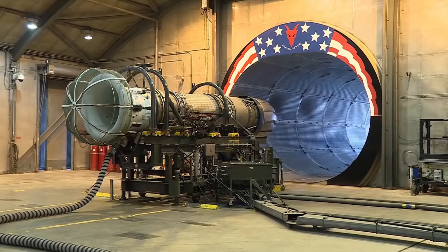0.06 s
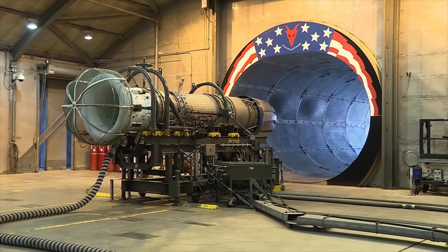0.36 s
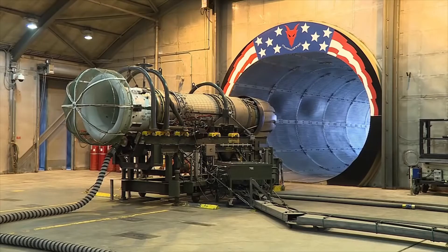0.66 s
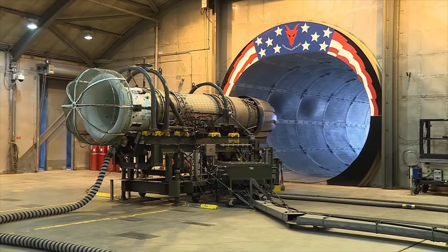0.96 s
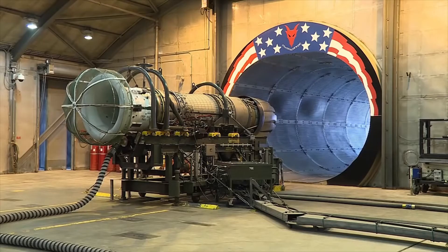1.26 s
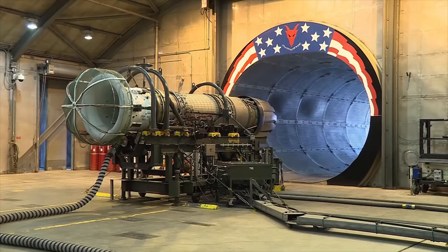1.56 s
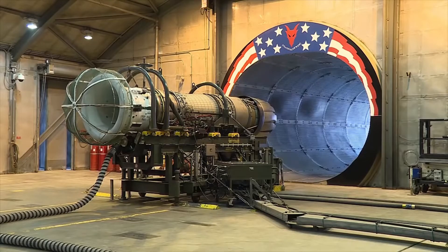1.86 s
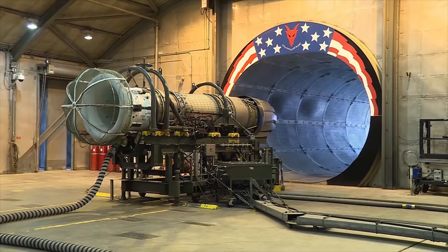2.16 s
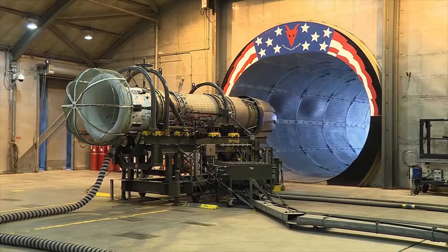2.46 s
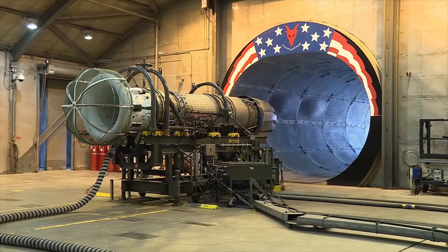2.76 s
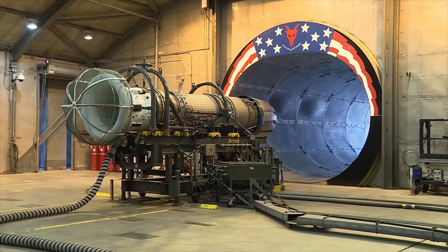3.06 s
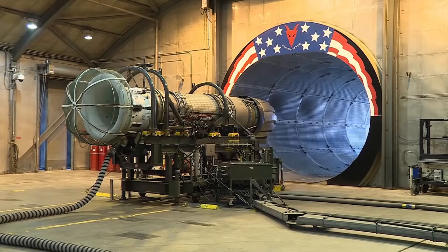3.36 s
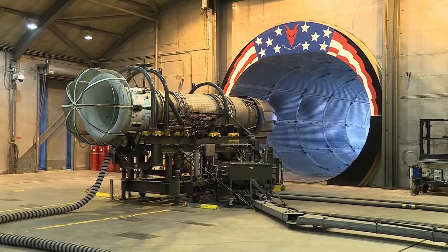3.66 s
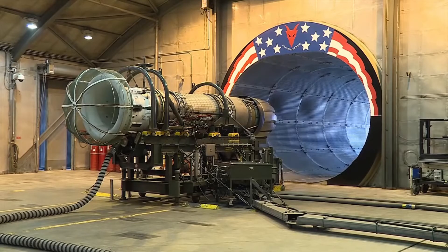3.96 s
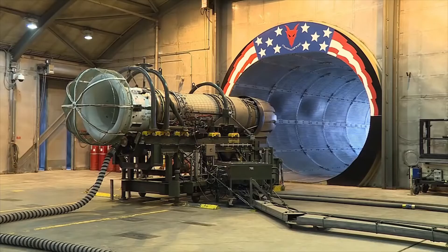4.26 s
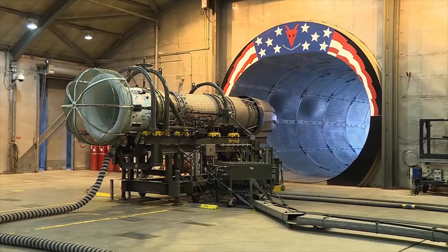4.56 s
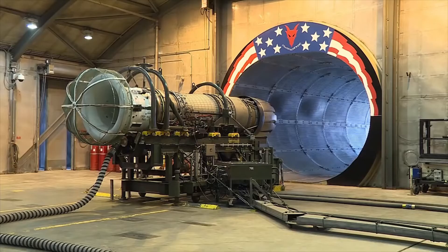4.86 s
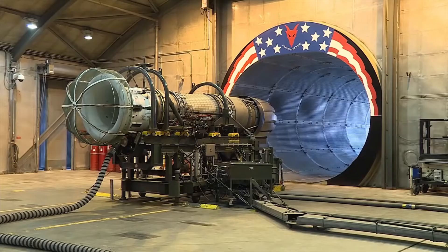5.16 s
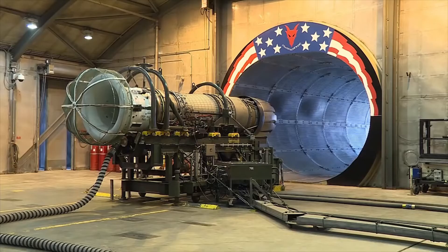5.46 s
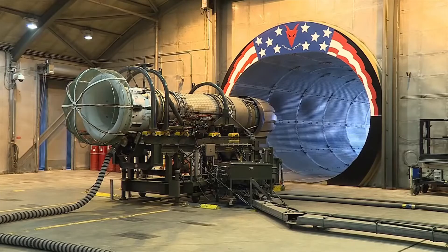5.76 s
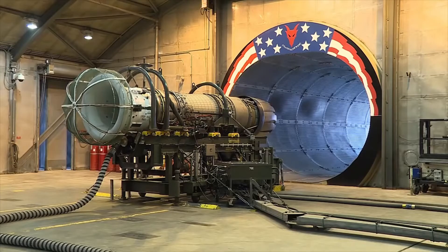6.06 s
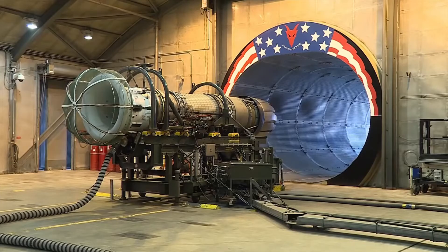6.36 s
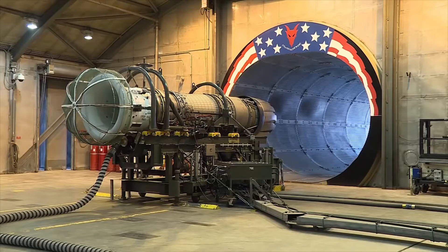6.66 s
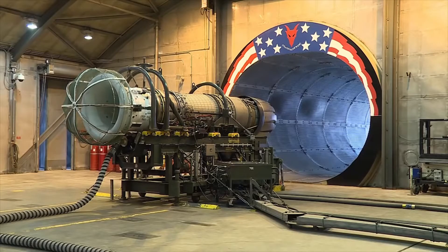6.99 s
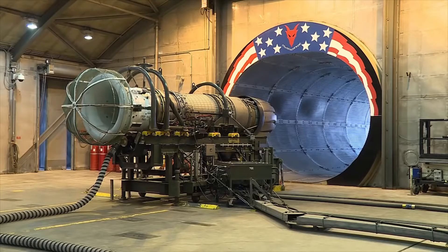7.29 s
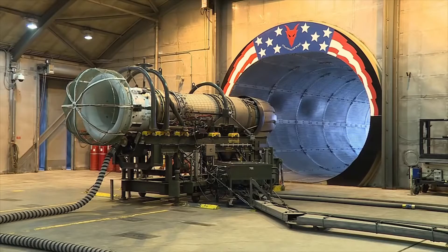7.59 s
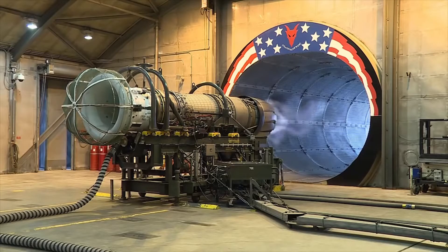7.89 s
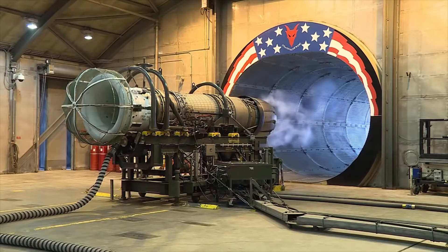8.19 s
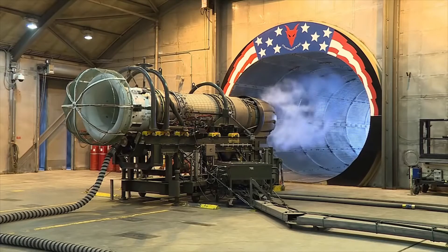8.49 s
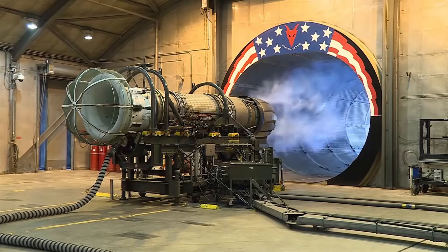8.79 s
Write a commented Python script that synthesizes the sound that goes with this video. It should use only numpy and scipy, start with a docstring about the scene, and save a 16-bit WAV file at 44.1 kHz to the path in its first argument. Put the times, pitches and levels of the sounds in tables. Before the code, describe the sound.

Steady air hiss and a climbing turbine whine stutter with tiny chirping gaps, and a low rumble joins near the end.

```python
"""A jet engine starts up: compressed air hisses and whistles through its starter.
The blades and gears whine higher and higher, and air rushes in through the compressor.
Near the end the fuel lights and a deep rumble fills the exhaust tunnel. The concrete test room
colours the noise. The whole sound keeps dropping out for instants, with a short chirp in each gap."""
import sys
import numpy as np
from scipy import signal
from scipy.fft import rfft, irfft, next_fast_len
from scipy.io import wavfile
from scipy.ndimage import uniform_filter1d, map_coordinates

SR = 44100
rng = np.random.default_rng(int(sys.argv[2]) if len(sys.argv) > 2 else 0)


def unload_audio(sound):
    """Save the sound as a 16-bit wav file, at the path given as the first command line argument."""
    columns = np.transpose(np.atleast_2d(sound))
    # keep every value between -1 and 1, then stretch to whole-number steps
    steps = np.round(np.clip(columns, -1, 1) * 32767)
    wavfile.write(sys.argv[1], SR, steps.astype(np.int16))


N = 393794
TIME = np.arange(N) / SR
START_HZ = 403.8  # the rotor's speed at the start, which is also the pitch of its lowest whine
LIGHT_S = 7.25  # when the fuel lights


def starter_hiss():
    """Compressed air hisses through the starter; the highest part of the hiss slowly dulls."""
    # The colour of the air jet. Each row: frequency in Hz, relative level in dB.
    hiss_colour = [(1500, -40), (2600, -13), (3600, -7), (4500, -2), (5600, -1.8), (6500, -4), (7500, -2.7),
                   (9900, -1.6), (11600, -1.7), (12250, 2), (13500, -1), (14980, -6), (15080, -13),
                   (15800, -14)]
    jet = air_noise(hiss_colour, patchy_db=1.36)
    sizzle = filtered(jet, lambda hz: hz > 11170)
    sizzle_gain = amp(-.5 * np.maximum(TIME - 5, 0))  # after 5 s, loses half a dB each second
    jet = jet - sizzle * (1 - sizzle_gain)
    level_db = -23 + 1.5 * octaves_gained() + .12 * wobble(8)
    return amp(level_db) * floor_bounce(jet, echo=.13)


def starter_whistle():
    """The starter air whistles at two close pitches; the main one swells unsteadily, then fades."""
    # The main whistle's pitch. Each row: time in seconds, pitch in Hz.
    pitches = [(3.1, 3197), (5.42, 3164), (5.57, 3132), (7.89, 3172), (8.38, 3247), (8.47, 3144),
               (8.93, 3150)]
    # It surges and falters. Each row: middle in seconds, half length in seconds, change in dB.
    surges = [(3.9, .1, -4), (5.22, .22, -5), (5.78, .05, 6), (5.87, .035, -12), (6.05, .2, 2.5),
              (8.47, .17, -9)]
    pitch_hz = np.interp(TIME, *np.transpose(pitches))
    past_peak_s = TIME - 7.3
    swell_db = np.minimum(2.5 * past_peak_s, -5.5 * past_peak_s)  # slow rise, quicker fall
    level_db = -32.5 + swell_db + bumps(surges, TIME)
    main = amp(level_db) * tone(pitch_hz, diffuse=.25, blur_hz=42)
    breathy = amp(-52) * tone(np.full(N, 3280), diffuse=.7, blur_hz=50.7)
    return main + breathy


def rotor_whine():
    """Blades and gears sing at multiples of the rotor's speed, louder where the ducts ring along."""
    # The blade and gear tones. Each row: multiple of the speed, starting level in dB,
    # change in dB per second.
    tones = [(1, -50.5, .2), (2, -52.5, -.2), (3, -54, .3), (4.61, -52, -1), (4.88, -54, -1),
             (6.76, -58, 1.1), (7.54, -55, .2), (9.76, -55, 1.2), (10.14, -47, 0), (24.05, -53, .55)]
    # Pitches at which the ducts ring. Each row: multiple of the tone that swells there,
    # centre in Hz, width in Hz, boost in dB.
    resonances = [(1, 422, 16, 8.5), (1, 452, 3, 4), (1, 472, 8, 7.5), (1, 496, 12, 8), (1, 560, 22, 5),
                  (2, 993, 10, 7), (2, 1034, 9, 15.5), (3, 1425, 25, 7), (4.61, 1885, 55, 11),
                  (4.88, 2040, 40, 7), (4.88, 2440, 45, 17.5), (6.76, 3450, 40, 6), (7.54, 3720, 200, 6),
                  (9.76, 5505, 42, 12), (10.14, 4820, 90, 6.5), (10.14, 5020, 60, 12),
                  (24.05, 12300, 1200, 13)]
    speed_hz = rotor_speed()
    whine = np.zeros(N)
    for multiple, start_db, db_per_s in tones:
        pitch_hz = multiple * speed_hz
        own_resonances = [row[1:] for row in resonances if row[0] == multiple]
        level_db = start_db + db_per_s * TIME + bumps(own_resonances, pitch_hz)
        whine += amp(level_db) * tone(pitch_hz, diffuse=.15, blur_hz=20 + 1.6 * multiple)
    return whine


def flame_rumble():
    """The fuel lights, and the uneven flame builds up and booms in the exhaust tunnel."""
    # The tunnel's boom, with two deep peaks. Each row: frequency in Hz, relative level in dB.
    rumble_colour = [(20, -24), (37, -15), (45, -1), (51, 0), (66, -7), (83, 1), (97, -8), (115, -18),
                     (200, -13), (245, -11), (310, -22), (600, -22), (1500, -27), (4000, -50)]
    full_db, growth_s = -27.8, .42
    build_up = 1 - np.exp(-np.maximum(TIME - LIGHT_S, 0) / growth_s)
    return build_up * amp(full_db + 1.2 * wobble(9.9)) * air_noise(rumble_colour, patchy_db=.5)


def intake_rush():
    """Air rushes unevenly through the turning compressor, louder as it speeds up."""
    # The colour of the incoming air. Each row: frequency in Hz, relative level in dB.
    rush_colour = [(15, -14.5), (35, -6), (90, -9), (200, -8.5), (380, -7), (490, -4), (560, -4.5),
                   (800, -1.5), (1180, -4), (1470, -0.5), (1900, -3), (2800, -12.5), (3640, -11.5),
                   (6160, -55)]
    level_db = -32.8 + 4 * octaves_gained() + .8 * wobble(16)
    return amp(level_db) * floor_bounce(air_noise(rush_colour, patchy_db=.9), echo=.099)


def dropouts(sound, chirp_s, chirp_db, chirp_count):
    """The sound sinks for instants; the pitches that stand out most chirp on through each gap."""
    # The gaps. Each row: middle in seconds, time spent fully down in seconds.
    gaps = [(.088, 0), (.194, 0), (.28, 0), (.344, 0), (.386, 0), (.45, 0), (.664, 0), (.792, 0),
            (1.155, 0), (1.347, 0), (1.389, 0), (1.455, 0), (1.858, 0), (2.007, 0), (2.05, 0), (2.157, 0),
            (2.221, 0), (2.284, 0), (2.329, 0), (2.37, 0), (2.455, 0), (2.531, .021), (2.691, 0),
            (2.733, 0), (2.904, 0), (2.978, .021), (3.031, 0), (3.074, 0), (3.448, .021), (3.832, .021),
            (4.055, 0), (4.343, .021), (4.567, 0), (4.675, 0), (5.016, 0), (5.08, 0), (5.166, 0),
            (5.207, 0), (5.272, 0), (5.549, 0), (5.592, 0), (5.634, 0), (6.051, .021), (6.253, 0),
            (6.402, 0), (6.499, .021), (6.616, 0), (6.659, 0), (6.989, .021), (7.619, 0), (7.874, 0),
            (8.408, 0), (8.535, 0), (8.728, 0)]
    depth_db, fade_s = -33.5, .021
    size = 3072  # samples around each gap
    padded = np.pad(sound, size)
    t = (np.arange(size) - size // 2) / SR
    window = np.exp(-(t / chirp_s) ** 2)
    for middle_s, hold_s in gaps:
        start = round(middle_s * SR) + size // 2
        piece = padded[start:start + size]
        fade = np.clip((np.abs(t) - hold_s / 2) / fade_s, 0, 1)  # 0 in the gap, 1 outside
        gain = amp(depth_db) + (1 - amp(depth_db)) * np.sin(np.pi / 2 * fade)
        spectrum = rfft(piece * window)
        # how far each pitch stands above its neighbours
        standout = np.abs(spectrum) / uniform_filter1d(np.abs(spectrum), size=300) ** .55
        # only the top few carry on, all about equally loud
        cutoff = np.sort(standout)[-chirp_count]
        weights = np.where(standout >= cutoff, cutoff / (standout + 1e-12), 0)
        chirps = window * irfft(spectrum * weights, size)
        padded[start:start + size] = gain * piece + amp(chirp_db) * chirps
    return padded[size:size + N]


def rotor_speed():
    """Speed in Hz: the starter gives an ever slower climb, then the burning fuel adds its push."""
    climb_hz_per_s, slacken_hz_per_s2, burn_hz_per_s = 25.5, 2.3, 17
    cranking = climb_hz_per_s * TIME - slacken_hz_per_s2 * TIME ** 2 / 2
    return START_HZ + cranking + burn_hz_per_s * np.maximum(TIME - LIGHT_S, 0)


def octaves_gained():
    """How far the rotor has sped up since the start; one octave is twice as fast."""
    return np.log2(rotor_speed() / START_HZ)


def air_noise(colour, patchy_db):
    """Swirling air: noise with random louder and softer patches, coloured by the room."""
    # Pitches the room boosts or weakens. Each row: centre in Hz, width in Hz, change in dB.
    room_colour = [(153, 16, 4), (285, 38, 3.5), (514, 23, -1.5), (571, 41, -2.5), (644, 36, 1.5),
                   (741, 43, -5), (945, 55, 3.5), (939, 29, -11.5), (1090, 43, 1.5), (1685, 54, 0),
                   (1868, 166, -3), (2290, 43, 5), (2326, 63, -6)]
    grid = signal.stft(rng.standard_normal(N), nperseg=512)[2]  # noise split by pitch and time
    patches = uniform_filter1d(rng.standard_normal(grid.shape), size=4, axis=0)
    patches = uniform_filter1d(patches, size=12, axis=1)
    noise = signal.istft(grid * amp(patchy_db * unit(patches)), nperseg=512)[1][:N]
    return unit(filtered(noise, lambda hz: amp(level_at(colour, hz) + bumps(room_colour, hz))))


def tone(hz, diffuse, blur_hz):
    """A tone heard directly and as wavering room echoes; diffuse is the echoes' share of the power."""
    echoes = unit(wobble(blur_hz) + 1j * wobble(blur_hz))  # wanders in level and phase
    blend = np.sqrt(1 - diffuse) + np.sqrt(diffuse) * echoes
    phase = 2 * np.pi * np.cumsum(hz) / SR
    return unit(np.real(blend * np.exp(1j * phase)))


def floor_bounce(sound, echo, delay_s=.004926):
    """A late copy off the concrete floor strengthens some pitches and weakens others."""
    return unit(sound + echo * np.roll(sound, round(delay_s * SR)))


def wobble(rate):
    """A smooth random curve that passes through rate new values each second."""
    coarse_s = TIME[::16]
    values = rng.standard_normal(int(N * rate / SR) + 4)
    return np.interp(TIME, coarse_s, map_coordinates(values, [coarse_s * rate], mode="nearest"))


def filtered(sound, gain_at):
    """Turn each frequency up or down by gain_at(hz)."""
    size = next_fast_len(N + 8192)
    return irfft(rfft(sound, size) * gain_at(np.fft.rfftfreq(size, 1 / SR)), size)[:N]


def level_at(points, hz):
    """Read the level between (Hz, dB) points, with octaves evenly spaced."""
    point_hz, point_db = np.transpose(points)
    return np.interp(np.log(hz + 1), np.log(point_hz + 1), point_db)


def bumps(rows, at):
    """Add up bell-shaped (centre, width, dB) bumps along frequency or time."""
    return sum(db * np.exp(-((at - centre) / width) ** 2) for centre, width, db in rows)


def amp(db):
    """Turn decibels into a number to multiply by."""
    return 10 ** (np.asarray(db) / 20)


def unit(x):
    """Scale to an average power of 1."""
    return x / np.sqrt(np.mean(np.abs(x) ** 2) + 1e-20)


def scene():
    """All the engine's sounds drop out together, the same on the left and the right."""
    engine = rotor_whine() + starter_hiss() + starter_whistle() + intake_rush() + flame_rumble()
    mono = dropouts(engine, chirp_s=.02, chirp_db=7.8, chirp_count=15)
    return np.array([mono, mono])


def record(dry):
    """Cut away the very highest treble."""
    return np.array([filtered(channel, lambda hz: hz < 15750) for channel in dry])


dry = scene()
out = record(dry)
unload_audio(out)
```